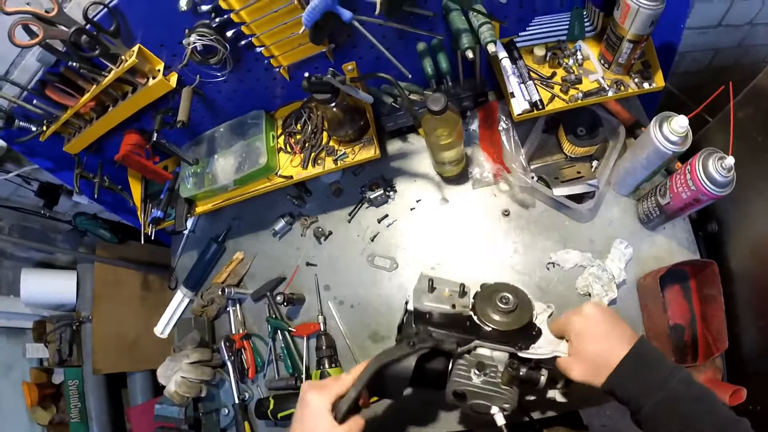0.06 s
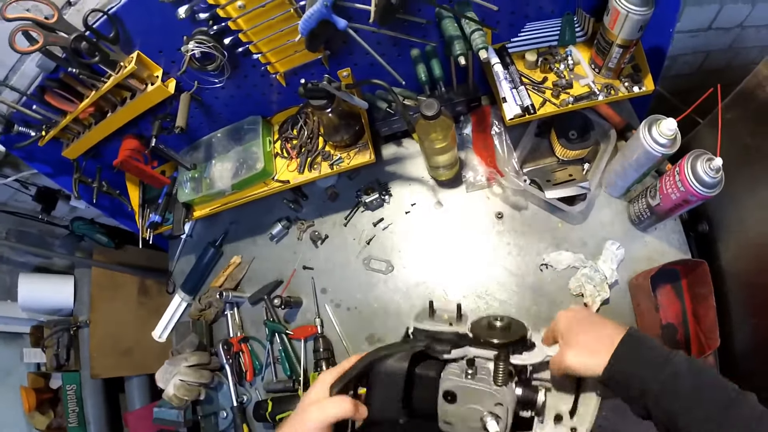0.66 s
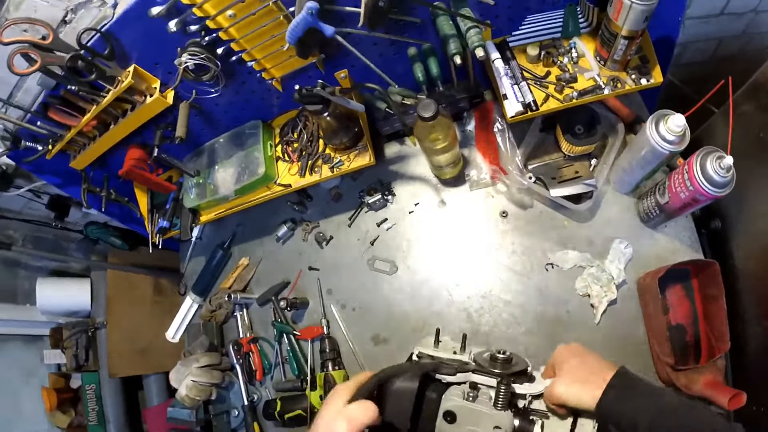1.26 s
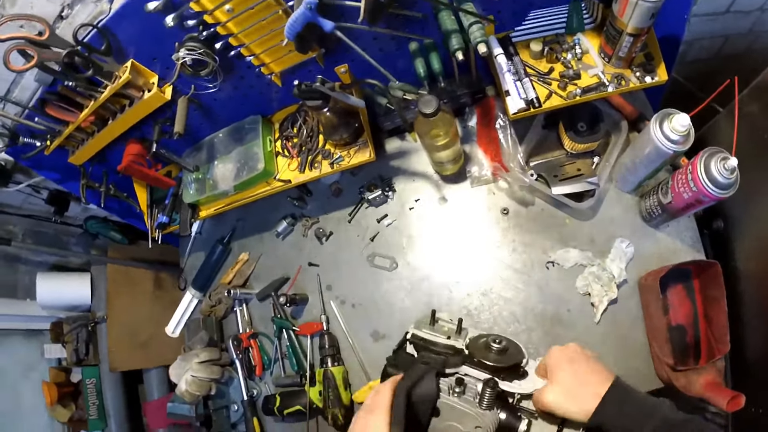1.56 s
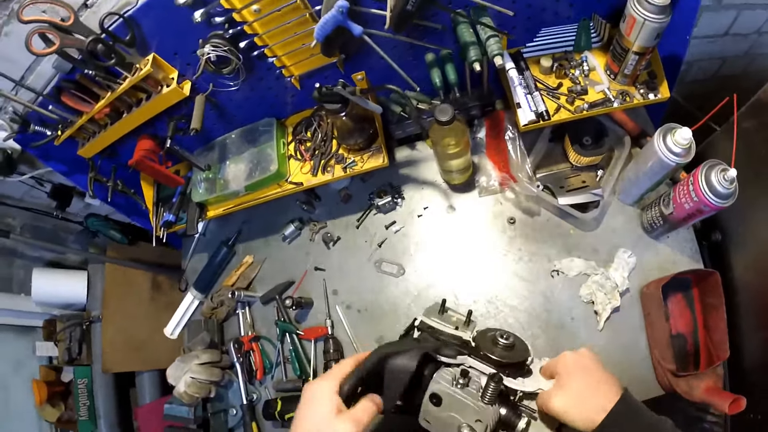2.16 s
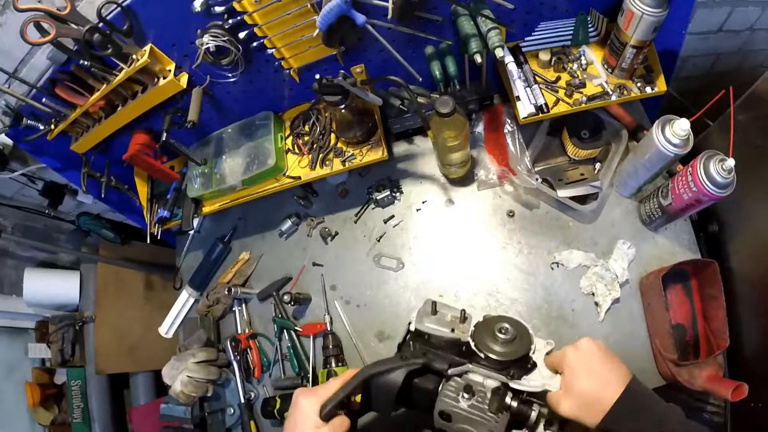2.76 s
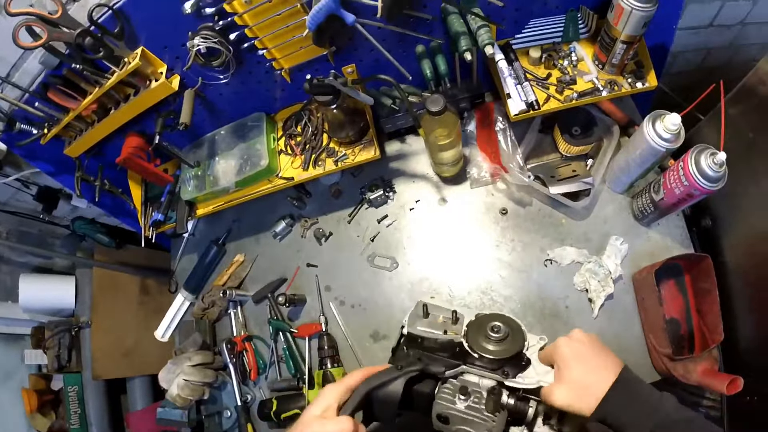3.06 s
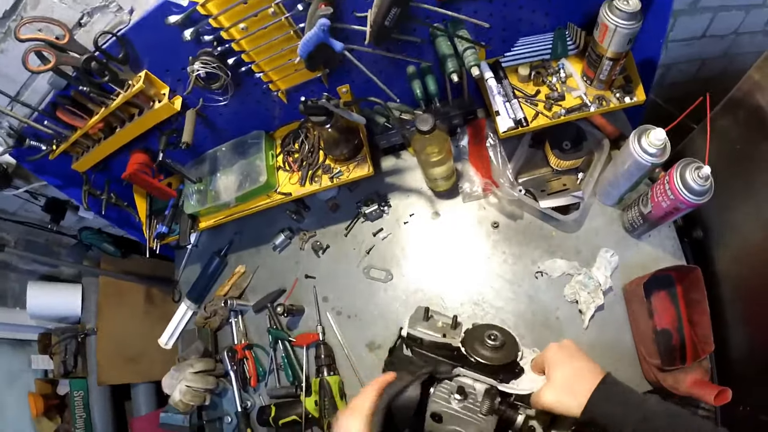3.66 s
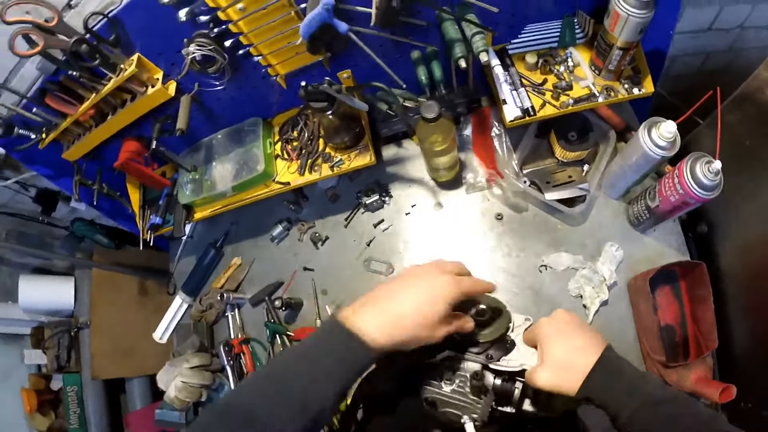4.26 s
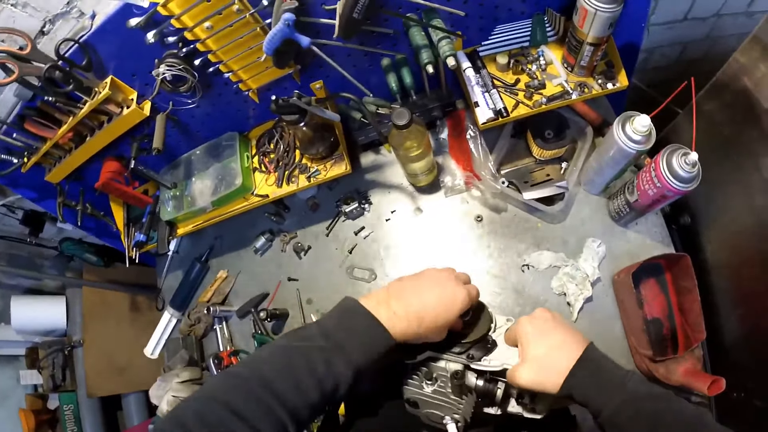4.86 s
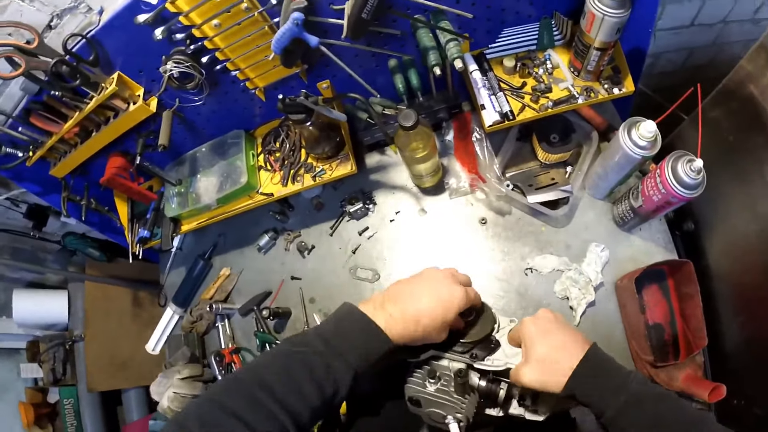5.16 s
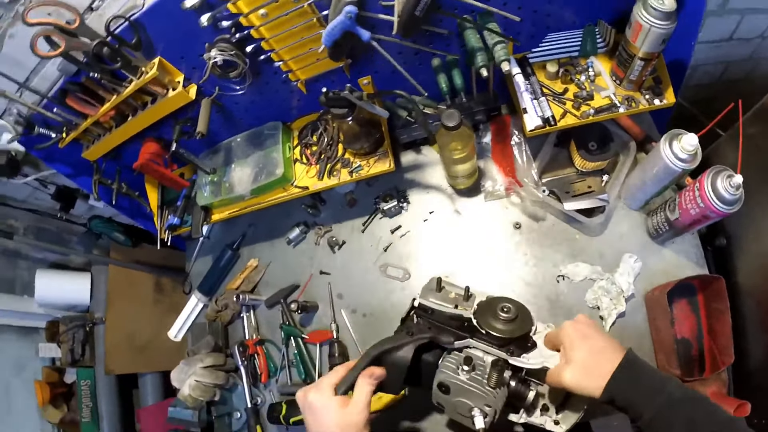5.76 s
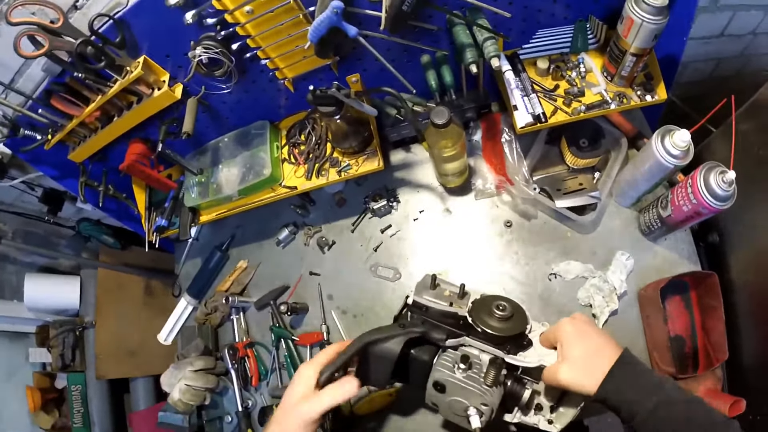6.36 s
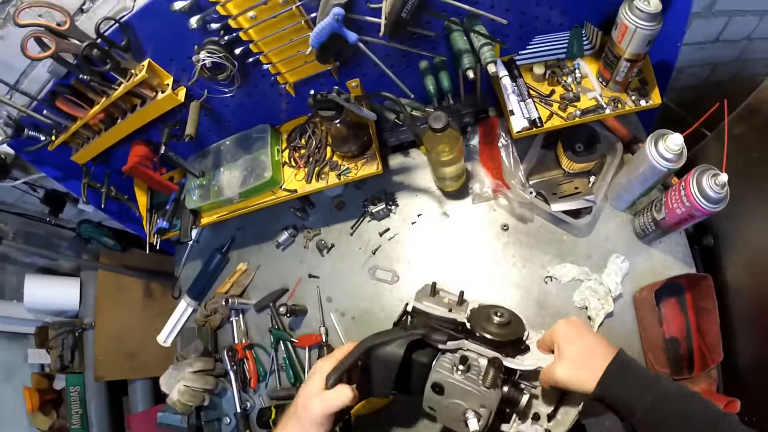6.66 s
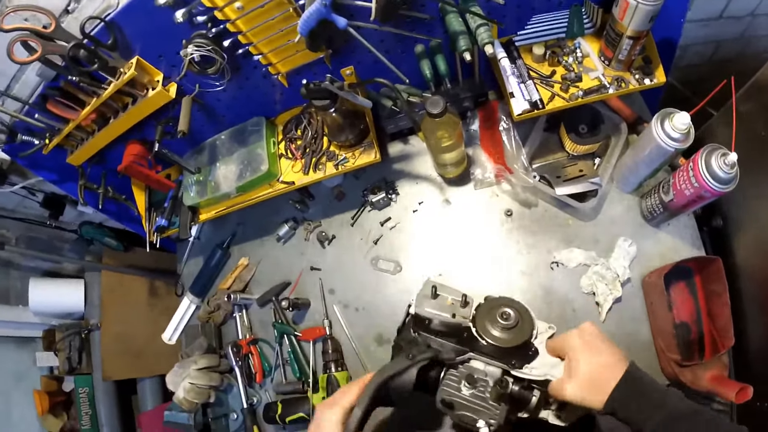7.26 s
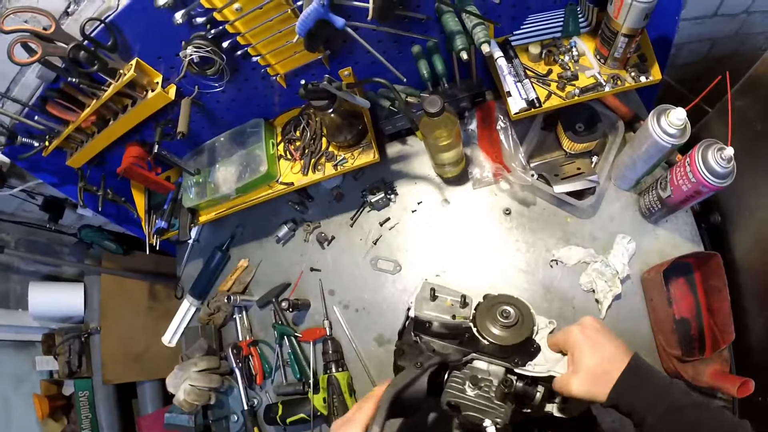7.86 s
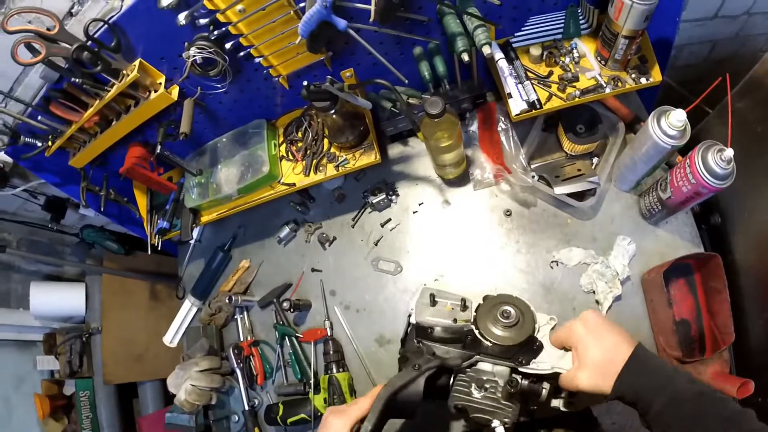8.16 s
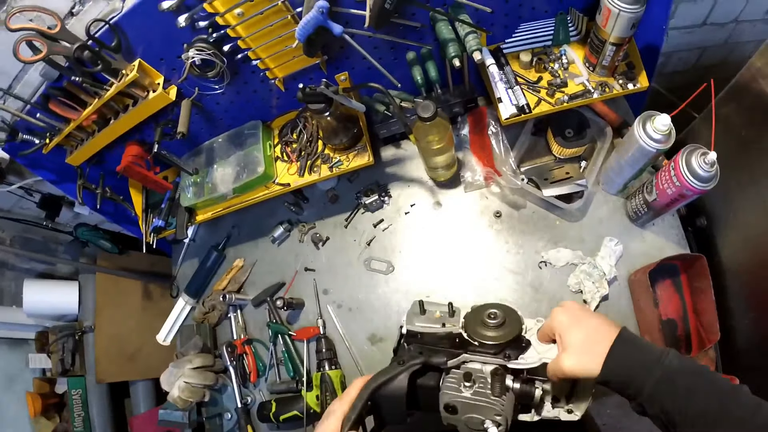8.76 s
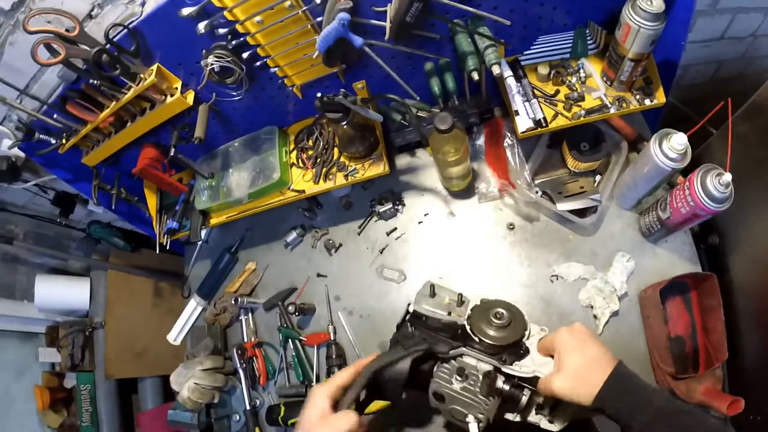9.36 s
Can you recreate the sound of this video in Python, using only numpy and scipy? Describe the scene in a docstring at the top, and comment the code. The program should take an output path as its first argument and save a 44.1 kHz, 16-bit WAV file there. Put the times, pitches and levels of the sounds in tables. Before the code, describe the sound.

A chainsaw's brake guard is pushed and pulled back four times, close to the microphone in a quiet workshop. Each push fires a loud metallic snap with a brief rattle and ring; each pull latches with a dry double clack. The saw sometimes thumps on the bench. Midway, the clutch drum is turned by hand and clinks five times with soft scraping. Light ticks and hand rubbing fill the gaps.

```python
"""A chainsaw lies on a workshop bench, close to a mono microphone. Its brake guard is pushed: the spring
fires, the steel band rattles and rings on the drum, the saw thumps on the bench. Hands rub on the housing,
loose parts tick, the guard knocks and the lever scrapes. At 1.5 s the guard is pulled back and latches
with a double clack. After a second trip and reset, the clutch drum is turned by hand: it clinks
(4.7-5.4 s) and scrapes softly between and after its clinks. Two more trips and resets follow."""
import sys
import numpy as np
from scipy import signal
from scipy.fft import rfft, irfft, next_fast_len
from scipy.io import wavfile
from scipy.ndimage import map_coordinates

SR = 44100
rng = np.random.default_rng(int(sys.argv[2]) if len(sys.argv) > 2 else 0)


def master(y):
    """Save y as 16-bit WAV."""
    cut = np.clip(np.atleast_2d(y).T, -1, 1)
    pcm = np.round(cut * 32767)  # scale
    wavfile.write(sys.argv[1], SR, pcm.astype(np.int16))


N = 419377
T = np.arange(2 * SR // 5) / SR  # time base of one blow, s
TAIL = np.arange(SR) / SR  # time base of a long ring or echo, s


def amp(db):
    """Decibels to gain."""
    return 10 ** (np.asarray(db) / 20)


def unit(x):
    """Scale to rms 1."""
    return x / np.sqrt(np.mean(x ** 2) + 1e-20)


def along(points, hz):
    """Interpolate (frequency [Hz], value) points on a log axis."""
    freqs, values = np.transpose(points)
    return np.interp(np.log(hz + 1), np.log(freqs + 1), values)


def noise(spectrum, size=len(T)):
    """Coloured noise, rms 1."""
    n_fft = next_fast_len(size)
    gain = amp(along(spectrum, np.fft.rfftfreq(n_fft, 1 / SR)))
    return unit(irfft(rfft(rng.standard_normal(n_fft)) * gain, n_fft)[:size])


def wobble(rate_hz, size=N):
    """Smooth random curve with knots at rate_hz."""
    position = np.arange(size) * rate_hz / SR
    return map_coordinates(rng.standard_normal(8192), [position], order=2, mode="wrap")


def rise(attack_s):
    """Exponential onset."""
    return 1 - np.exp(-T / attack_s)


def fade(t60_s, attack_s=0.00077):
    """Quick rise, exponential decay."""
    return np.exp(-np.log(1000) * T / t60_s) * rise(attack_s)


def hold(hold_s, t60_s, t=T):
    """Unity gain for hold_s, then exponential decay."""
    return amp(-60 * np.maximum(t - hold_s, 0) / t60_s)


def add(track, s, sound):
    """Mix a sound into the track at time s."""
    part = track[round(s * SR):][:len(sound)]
    part += sound[:len(part)]


def swells(events, attack_s, t60_s):
    """Rise-hold-release gain for (start [s], length [s], level [dB]) events."""
    gain = np.zeros(N)
    for s, length_s, db in events:
        t = np.arange(round((length_s + t60_s) * SR)) / SR
        add(gain, s, amp(db) * hold(length_s, t60_s, t) * np.minimum(t / attack_s, 1))
    return gain


def ring(modes, scatter_db, blur):
    """Damped modes at random strengths; loose contacts widen each by blur times its frequency."""
    hz, db, t60_s = np.transpose(modes)[:, :, None]
    t = T[T < t60_s.max()]
    gain = amp(db + scatter_db * rng.standard_normal(db.shape))
    drift = np.cumsum(rng.standard_normal((len(modes), len(t))), axis=1)
    drift *= np.sqrt(2 * np.pi * blur * hz / SR)
    waves = gain * np.exp(-np.log(1000) * t / t60_s) * np.sin(2 * np.pi * hz * t + drift)
    nominal_rms = np.sqrt(np.sum(amp(db) ** 2) / 2)
    return np.pad(waves.sum(0), (0, len(T) - len(t))) / nominal_rms


def long_ring(modes, scatter_db):
    """Clean damped modes at random strengths."""
    hz, db, t60_s = np.transpose(modes)[:, :, None]
    gain = amp(db + scatter_db * rng.standard_normal(db.shape))
    return np.sum(gain * np.sin(2 * np.pi * hz * TAIL) * np.exp(-np.log(1000) * TAIL / t60_s), axis=0)


def slips(modes, per_s, spread_db=4):
    """Stick-slip: uneven random catches ring the modes; rms 1."""
    catches = (rng.random(N) < per_s / SR) * rng.choice([-1, 1], N)
    strength = amp(spread_db * rng.standard_normal(N))
    response = ring(modes, scatter_db=2.5, blur=0.013)
    return unit(signal.fftconvolve(catches * strength, response)[:N])


# room noise: (frequency [Hz], density [dB])
ROOM_NOISE = [(20, 5), (75, -9), (125, -14), (220, -29), (830, -31), (1500, -33), (7100, -39.5),
              (15000, -50)]
# bench rumble: (frequency [Hz], density [dB])
BENCH_BOOM = [(20, -11.5), (40, 4.5), (90, -8.5), (120, 5.5), (170, -18), (260, -20.5), (600, -30.5),
              (1500, -69.5)]
# saw shifts its weight: (start [s], length [s], level [dB])
SHIFTS = [(.79, 0.031, -45), (1.9, 0.071, -45), (2.15, 0.078, -47.5), (3.05, 0.11, -51),
          (3.53, 0.53, -49.5), (6.55, 0.43, -55), (8.15, 0.62, -59)]
def room_tone():
    """Faint hiss, low hum, and the bench rumbling as the saw shifts."""
    rumble_gain = amp(-68.5) + swells(SHIFTS, attack_s=0.0054, t60_s=0.44)
    hum = amp(-69) * np.sin(2 * np.pi * 116 * np.arange(N) / SR)
    hiss = amp(-57.5) * noise(ROOM_NOISE, size=N)
    return hiss + hum + rumble_gain * noise(BENCH_BOOM, size=N)


# brake trips: (time [s], level [dB], rattle t60 [s], band level [dB], band free swing [s],
# lever pitch [Hz], lever level [dB], guard level [dB], fin level [dB])
TRIPS = [(0.1432, -1, 0.19, -2.5, 0.13, 1842, -16.5, -15.5, -53),
         (2.794, -2, 0.19, -3, 0.051, 1747, -18.5, -9.5, -51.5),
         (6.077, -2, 0.19, -14, 0.019, 1769, -8.5, -16, -47),
         (8.365, -1, 0.18, -12, 0.065, 2072, -12, -10.5, -54.5)]
# linkage rattle: (frequency [Hz], density [dB])
RATTLE = [(120, -37.5), (300, -16), (680, -6), (1150, -8.5), (1750, -1), (2700, -4), (4400, -4),
          (7500, -4.5), (10500, -7), (12000, -9), (15000, -17)]
# housing modes: (frequency [Hz], level [dB], t60 [s])
HOUSING_MODES = [(1130, -18, .05), (1610, 2, .12), (1760, 0, .08), (1890, -2, .07), (2200, -6, .07),
                 (2410, -2, .05), (3720, -8, .05), (4000, -2, .06), (4320, -9, .05)]
def brake_trips():
    """The spring slams the band on the drum; the linkage chatters, the lever rings, the guard knocks."""
    out = np.zeros(N)
    for s, db, t60_s, _, _, lever_hz, lever_db, guard_db, _ in TRIPS:
        chatter = amp(1.5 * wobble(220, size=len(T)))
        envelope = fade(t60_s, attack_s=0.00036) + amp(-7.5) * fade(0.053)
        rattle = noise(RATTLE) * chatter * envelope
        housing = amp(-18.5) * ring(HOUSING_MODES, scatter_db=-1.5, blur=0.0081)
        lever = amp(lever_db) * lever_ring(lever_hz)
        guard = amp(guard_db) * guard_shell(hz=697)
        add(out, s, amp(db) * (rattle + housing + lever + guard))
    return out


def lever_ring(hz, t60_s=0.06):
    """Short, rough ring of the brake lever; its seating sets the pitch."""
    return ring([(hz, 0, t60_s)], scatter_db=-0.5, blur=0.046)


# guard shell modes: (frequency [x pitch], level [dB], t60 [s])
SHELL_MODES = [(1, 0, .045), (1.42, -6, .035), (2.25, -9, .03)]
def guard_shell(hz):
    """Hollow note of the plastic guard; the grip sets the pitch."""
    modes = [(hz * ratio, db, t60_s) for ratio, db, t60_s in SHELL_MODES]
    return ring(modes, scatter_db=2.5, blur=0.06) * rise(0.003)


# brake band modes, mostly in close pairs: (frequency [Hz], level [dB])
BAND_MODES = [(9178, -16), (10243, -12), (10330, -11), (11390, -1), (11482, -3), (12351, -15), (12545, -15),
              (12634, -15), (13503, -9), (13535, -11), (14656, -20)]
def band_ring(reset_lag_s=0.024, reset_db=-26.5, reset_free_s=0.016):
    """The steel band's modes beat until it seats and chokes: loud on a trip, faint on a reset."""
    out = np.zeros(N)
    hz, mode_db = np.transpose(BAND_MODES)[:, :, None]
    swings = [(s, db, free_s) for s, _, _, db, free_s, *_ in TRIPS]
    releases = [(s + travel_s + reset_lag_s, reset_db + db, reset_free_s)
                for s, _, travel_s, db, *_ in RESETS]
    for s, db, free_s in swings + releases:
        gain = amp(mode_db + 2 * rng.standard_normal(hz.shape))
        waves = gain * np.sin(2 * np.pi * (hz * T + rng.random(hz.shape)))
        choke = hold(free_s, t60_s=0.3)
        add(out, s, amp(db) * unit(waves.sum(0)) * fade(0.34, attack_s=0.0073) * choke)
    return out


# cooling fin modes: (frequency [Hz], level [dB], t60 [s])
FIN_MODES = [(1606, -6, .8), (1676, 1, 1.2), (1760, -5, 1), (1880, -7, .7), (3892, -7, .9),
             (4325, -15, 1.3)]
# blur of close fin modes: (frequency [Hz], density [dB])
FIN_SHIMMER = [(1200, -20), (1650, 0), (2000, -3), (2500, -4), (3100, -15), (4300, -10), (6000, -28)]
def fin_ring(shimmer_t60_s=1, reset_db_per_octave=8):
    """The cylinder's fins ring on: trips add a shimmer, sharp resets favour the higher modes."""
    out = np.zeros(N)
    for s, db, *_, fins_db in TRIPS:
        shimmer = amp(db - 43 - 60 * TAIL / shimmer_t60_s) * noise(FIN_SHIMMER, size=SR)
        add(out, s, amp(fins_db) * long_ring(FIN_MODES, scatter_db=2.5) + shimmer)
    tilted = [(hz, db + reset_db_per_octave * np.log2(hz / FIN_MODES[0][0]), t60_s)
              for hz, db, t60_s in FIN_MODES]
    for s, _, travel_s, *_, fins_db in RESETS:
        add(out, s + travel_s, amp(fins_db) * long_ring(tilted, scatter_db=6.5))
    return out


# hands rub on the housing; the turned clutch drum scrapes softly between and after its clinks:
# (start [s], length [s], rub level [dB], hiss level [dB])
RUBS = [(0.534, 0.56, -63.5, -61.5), (0.727, 0.22, -52, -53), (1.08, 0.19, -60, -64),
        (2.428, 0.091, -53.5, -56), (3.339, 0.073, -61.5, -59.5), (4.303, 1.2, -69, -66.5),
        (5.369, 0.076, -50.5, -44.5), (5.574, 0.28, -64, -64), (6.759, 0.058, -56.5, -51),
        (8.705, 0.15, -60, -59.5)]
# sliding friction: (frequency [Hz], density [dB])
FRICTION = [(150, -11.5), (400, -5), (850, -2), (1350, -8.5), (1800, -1.5), (2800, 2.5), (4500, -10.5),
            (9000, -22)]
# treble of sliding and striking contacts: (frequency [Hz], density [dB])
CONTACT_HISS = [(2000, -16.5), (4500, -1.5), (7000, 1), (10000, -6.5), (15000, -18)]
# hollow guard modes: (frequency [Hz], level [dB], t60 [s])
GUARD_MODES = [(484, -8.5, 0.0072), (815, 1, 0.009), (1100, -3.5, 0.025), (1620, -0.5, 0.013),
               (2090, -4, 0.042), (3450, -9, 0.014)]
def rubbing(grip_s=0.86, grip_rub_db=-64, grip_hiss_db=-68):
    """Hands rub and the turned drum scrapes with a soft hiss; catching grit taps the hollow guard."""
    # the hand slips on the guard after each trip and reset
    grips = [(s, grip_s, grip_rub_db, grip_hiss_db) for s, *_ in TRIPS + RESETS]
    start_s, length_s, rub_db, hiss_db = np.transpose(RUBS + grips)
    rub_gain = swells(zip(start_s, length_s, rub_db), attack_s=0.038, t60_s=0.15)
    hiss_gain = swells(zip(start_s, length_s, hiss_db), attack_s=0.038, t60_s=0.15)
    drag = unit(amp(2.5 * wobble(480) + 2.5 * wobble(40)))
    friction = amp(-8) * rub_gain * noise(FRICTION, size=N)
    hiss = amp(-2.5) * hiss_gain * noise(CONTACT_HISS, size=N)
    grit = amp(-3.5) * rub_gain * slips(GUARD_MODES, per_s=300)
    return drag * (friction + hiss) + grit


# saw drops on the bench: (time [s], level [dB])
THUMPS = [(0.185, -23), (1.51, -21.5), (1.563, -17), (2.829, -10), (3.868, -29), (6.106, -6), (7.057, -11),
          (9.164, -30), (9.205, -23.5), (9.273, -17)]
# bench top modes: (frequency [Hz], level [dB], t60 [s])
BENCH_MODES = [(48, -13, .25), (81, -1, .25), (114, 0, .34), (134, -4, .25), (181, -6, .2), (226, -13, .18),
               (285, -15, .18), (436, -16, .13)]
# saw body thud: (frequency [Hz], density [dB])
SAW_BODY = [(60, -18), (200, 4), (400, 2.5), (750, -6.5), (1200, -10), (2500, -18.5)]
def bench_thumps(recoil_lag_s=0.0033, recoil_db=-30.5):
    """The saw drops or recoils on the bench; harder, shorter contacts wake higher modes. With echo."""
    out = np.zeros(N)
    recoils = [(s + recoil_lag_s, recoil_db) for s, *_ in TRIPS]
    for s, db in recoils + THUMPS:
        db_per_octave = 0.63 * (db + 10.5)
        modes = [(hz, mode_db + db_per_octave * np.log2(hz / 120), t60_s)
                 for hz, mode_db, t60_s in BENCH_MODES]
        top = ring(modes, scatter_db=1, blur=0.004) * rise(0.002)
        boom = amp(-8) * noise(BENCH_BOOM) * fade(0.22, attack_s=0.002)
        body = amp(-16.5) * noise(SAW_BODY) * fade(0.22, attack_s=0.003)
        add(out, s, amp(db - 0.5) * (top + boom + body))
    return out + amp(-14) * echo(out, FAR_WALLS, delay_s=0.047)


# loose steel parts touch: (time [s], level [dB], edge level [dB])
TICKS = [(0.547, -38, -4), (0.7, -30, -8.5), (1.1524, -42, -14), (1.8076, -31.5, -13.5),
         (1.9208, -26, -16.5), (2.065, -38.5, -31), (2.149, -40, -12), (2.4582, -31.5, -24.5),
         (3.2033, -29.5, -2.5), (4.117, -38.5, -11), (4.141, -28.5, -14), (4.205, -39, -22),
         (4.304, -44.5, -15.5), (4.9207, -41.5, 4), (5.33, -41.5, 3), (5.4093, -40.5, 8.5),
         (5.821, -31, -18), (6.553, -36.5, -8), (7.197, -32, 2), (7.311, -39, -14), (7.343, -32.5, -13),
         (7.487, -44, -6), (7.581, -40, -25), (7.6198, -28, -17), (7.738, -44.5, -8), (7.845, -26, -12.5),
         (8.009, -42, -6), (8.104, -47, -24), (8.157, -29, -11), (8.681, -37.5, -7)]
# steel click: (frequency [Hz], density [dB])
CLICK = [(600, -33.5), (1300, -16), (1620, 1.5), (2150, -2), (2400, 2), (3150, -6.5), (4050, 0.5),
         (4900, -10.5), (6500, -12), (12000, -33.5)]
# dull knock: (frequency [Hz], density [dB])
DULL_KNOCK = [(100, -14), (300, -3.5), (550, -2.5), (800, 2.5), (1200, 0), (2200, -31.5)]
def linkage_ticks(slack_db=-36.5, slack_edge_db=-4):
    """Light steel contacts clink in the housing; the linkage also takes up slack before each reset."""
    out = np.zeros(N)
    slack = [(s - lead_s, slack_db, slack_edge_db) for s, lead_s, *_ in RESETS]
    for s, db, edge_db in TICKS + slack:
        click = amp(-4) * noise(CLICK) * fade(0.043, attack_s=0.00071)
        clink = amp(-10.5) * ring(HOUSING_MODES, scatter_db=3, blur=0.008) * rise(0.001)
        knock = amp(-16.5) * noise(DULL_KNOCK) * fade(0.08)
        edge = amp(edge_db - 1.5) * noise(CONTACT_HISS) * fade(0.05)
        add(out, s, amp(db) * (click + clink + knock + edge))
    return out


# soft guard bumps: (time [s], level [dB], pitch [Hz])
KNOCKS = [(0.686, -35.5, 780), (0.806, -33.5, 816), (1.155, -45.5, 900), (1.748, -43.5, 1100),
          (1.806, -42.5, 540), (1.896, -39.5, 820), (2.148, -37, 760), (2.183, -42, 780), (2.452, -44, 800),
          (7.578, -42.5, 980), (7.79, -51, 900), (9.366, -35.5, 1020)]
def guard_knocks():
    """The guard bumps the hand and its stops: a hollow note over a dull puff."""
    out = np.zeros(N)
    for s, db, hz in KNOCKS:
        puff = amp(-3.5) * noise(DULL_KNOCK) * fade(0.18, attack_s=0.003)
        add(out, s, amp(db) * (guard_shell(hz) + puff))
    return out


# lever drags: (start [s], length [s], level [dB])
SCRAPES = [(0.69, 0.13, -51), (2.39, 0.15, -59), (5.81, 0.052, -55), (6.765, 0.068, -49),
           (8.745, 0.17, -55.5)]
# pivot and link modes: (frequency [Hz], level [dB], t60 [s])
PIVOT_MODES = [(1000, -10, .02), (1770, 0, .025), (1900, -2, .025), (2250, -7, .015), (5110, -12, .015),
               (5800, -10, .012), (7170, -8, .015)]
def pivot_scrapes():
    """The lever grates on its steel pivot as the guard is eased towards its catch."""
    return swells(SCRAPES, attack_s=0.016, t60_s=0.095) * slips(PIVOT_MODES, per_s=790)


# brake resets: (time [s], slack lead [s], travel to stop [s], first clack [dB], stop clack [dB],
# body level [dB], lever pitch [Hz], lever level [dB], fin level [dB])
RESETS = [(1.4861, 0.03, 0.034, -8, 3, -21, 2306, -4, -57),
          (3.834, 0.02, 0.027, -5.5, 3.5, -28, 1635, -15, -57.5),
          (7.0375, 0.026, .0222, -3, 5, -12.5, 1708, -15.5, -60.5),
          (9.191, 0.039, 0.024, -0.5, 4, -30, 1615, -10.5, -59.5)]
# latch crack: (frequency [Hz], density [dB])
LATCH = [(400, -44.5), (950, -9), (1450, -9), (2200, -0.5), (3000, -3), (4000, 0.5), (5200, 2), (6500, -3),
         (10400, -7.5), (15000, -19)]
def brake_resets():
    """The lever goes over centre, then hits its stop: two dry cracks with a shiver of the linkage."""
    out = np.zeros(N)
    snap = hold(0.0028, t60_s=0.038) * rise(0.001)  # latch grinds home, stops dead
    for start_s, _, travel_s, first_db, stop_db, body_db, lever_hz, lever_db, _ in RESETS:
        for s, db in (start_s, first_db), (start_s + travel_s, stop_db):
            crack = noise(LATCH) * (amp(3) * snap + amp(-13.5) * fade(0.15))
            body = amp(body_db + 2) * noise(SAW_BODY) * fade(0.22, attack_s=0.002)
            housing = amp(-10) * ring(HOUSING_MODES, scatter_db=2, blur=0.015)
            lever = amp(lever_db) * lever_ring(lever_hz)
            add(out, s, amp(db - 14.5) * (crack + body + housing + lever))
    return out


# drum strikes a clutch shoe: (time [s], level [dB])
CLINKS = [(4.74, -13.5), (4.9509, -8.5), (5.095, -8.5), (5.2061, -7.5), (5.358, -12.5)]
# clutch drum modes: (frequency [Hz], touching level [dB], free level [dB])
DRUM_MODES = [(1888, -15, -17), (3900, -11, -31), (4928, -15, -35), (6075, -1, -21), (7060, -15, -34),
              (8285, -2, -23), (10950, -11, -32), (13880, -6, -28)]
def drum_clinks(touch_t60_s=0.032, free_t60_s=0.15, rebound_db=-2.5):
    """Turned by hand, the loose drum strikes a shoe, bounces once and rings briefly under the fingers."""
    out = np.zeros(N)
    touching = [(hz, db, touch_t60_s) for hz, db, _ in DRUM_MODES]
    free = [(hz, db, free_t60_s) for hz, _, db in DRUM_MODES]
    for s, db in CLINKS:
        rebound_s = 0.0035 * (1 + rng.random() / 2)
        for lag_s, loss_db in (0, 0), (rebound_s, rebound_db):
            contact = (amp(-21.5) * noise(CONTACT_HISS) + amp(-36) * noise(DULL_KNOCK)) * fade(0.036)
            drum = amp(-10) * ring(touching, scatter_db=2, blur=0.011) * rise(0.0015)
            add(out, s + lag_s, amp(db + loss_db) * (drum + contact))
        add(out, s, amp(db - 15) * long_ring(free, scatter_db=2))
    return out


def echo(x, decay, delay_s):
    """Diffuse reflections build up over delay_s; each frequency dies at its own rate."""
    hz, t, spectra = signal.stft(rng.standard_normal(SR), SR, nperseg=256)
    damping = amp(-60 * t / along(decay, hz)[:, None])
    tail = signal.istft(spectra * damping, SR, nperseg=256)[1][:SR]
    tail *= 1 - np.exp(-(TAIL / delay_s) ** 2)
    return signal.fftconvolve(x, tail / np.linalg.norm(tail))[:N]


# near wall decay: (frequency [Hz], t60 [s])
NEAR_WALLS = [(100, 0.047), (700, 0.46), (2000, .28), (5000, 0.26), (10000, .24), (15000, 0.079)]
# far wall decay: (frequency [Hz], t60 [s])
FAR_WALLS = [(100, 0.9), (700, 0.51), (2000, 0.93), (5000, 1.6), (9000, 0.65), (15000, 0.98)]
def scene():
    """Saw, near reflections and faint long echo; both channels alike."""
    trips, clinks = brake_trips(), drum_clinks()
    handling = brake_resets() + linkage_ticks() + guard_knocks() + rubbing() + pivot_scrapes()
    near = amp(-11) * echo(handling + clinks / 2, NEAR_WALLS, delay_s=0.0047)
    near += amp(-17.5) * echo(trips, NEAR_WALLS, delay_s=0.012)
    far = amp(-43.5) * echo(trips + handling, FAR_WALLS, delay_s=0.027)
    direct = trips + band_ring() + fin_ring() + handling + clinks
    mono = direct + near + far + bench_thumps() + room_tone()
    return np.array([mono, mono])


def record(dry):
    """The loudest blows overload the microphone; a steep low-pass limits the band."""
    hardness, cutoff_hz = 6, 15300
    clipped = dry / (1 + np.abs(dry) ** hardness) ** (1 / hardness)
    n_fft = next_fast_len(N + SR // 2)
    lowpass = 1 / (1 + (np.fft.rfftfreq(n_fft, 1 / SR) / cutoff_hz) ** 120)
    return irfft(rfft(clipped, n_fft) * lowpass, n_fft)[:, :N]


dry = scene()
out = record(dry)
master(out)
```